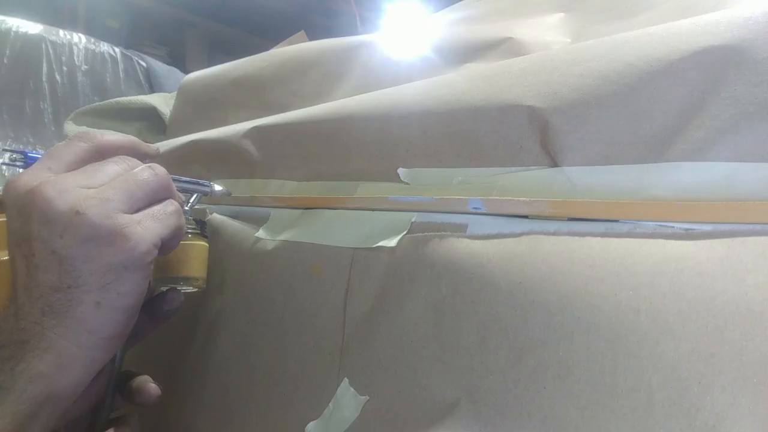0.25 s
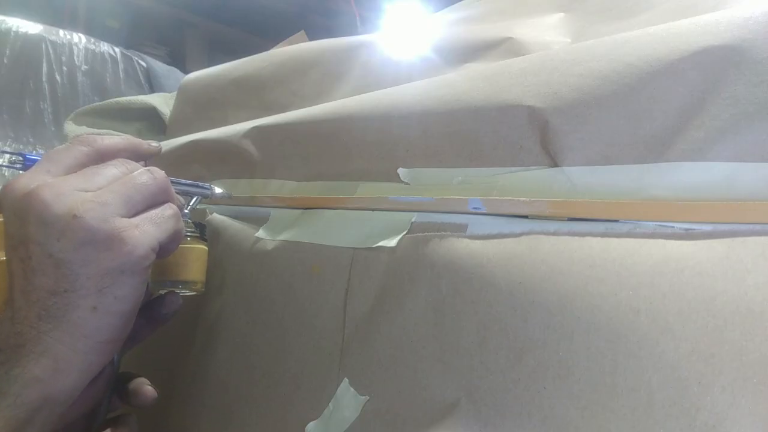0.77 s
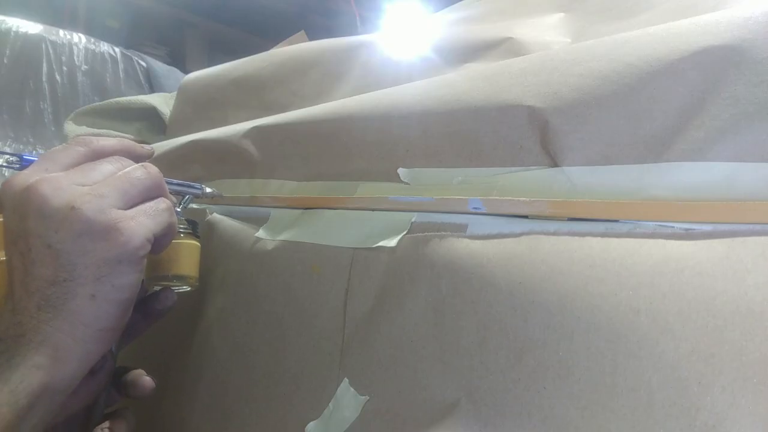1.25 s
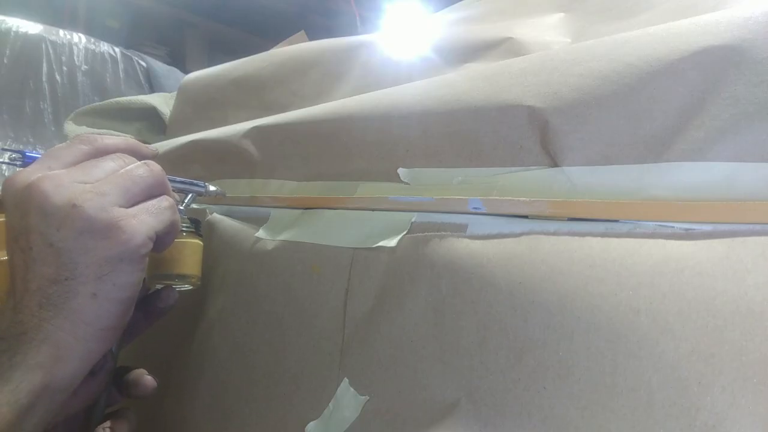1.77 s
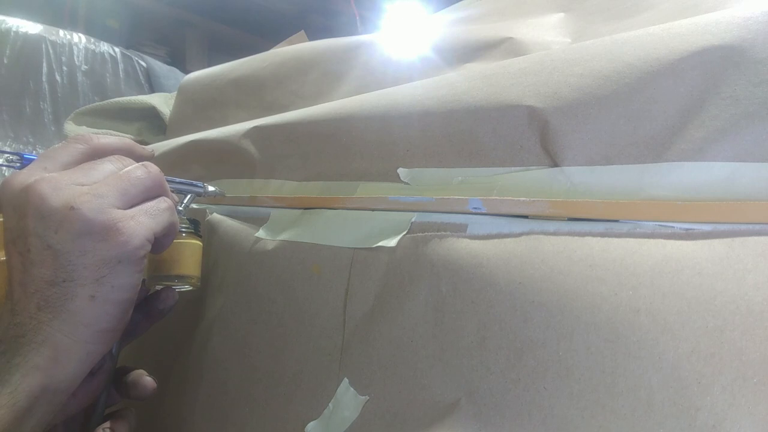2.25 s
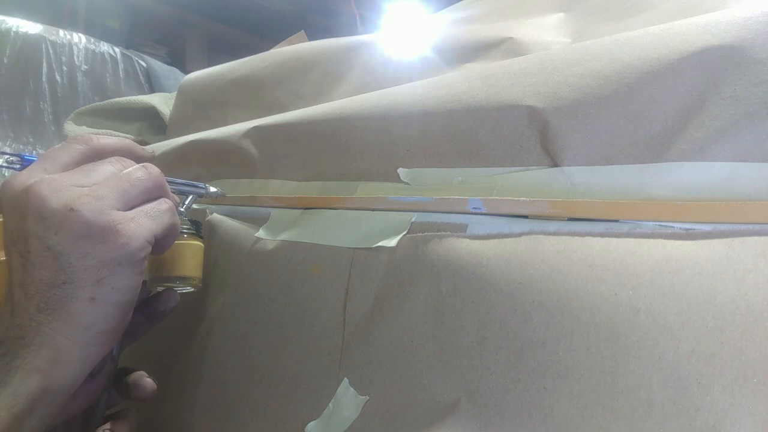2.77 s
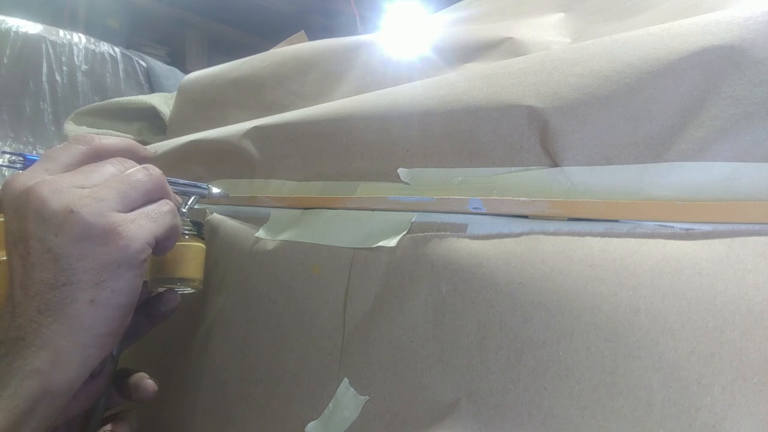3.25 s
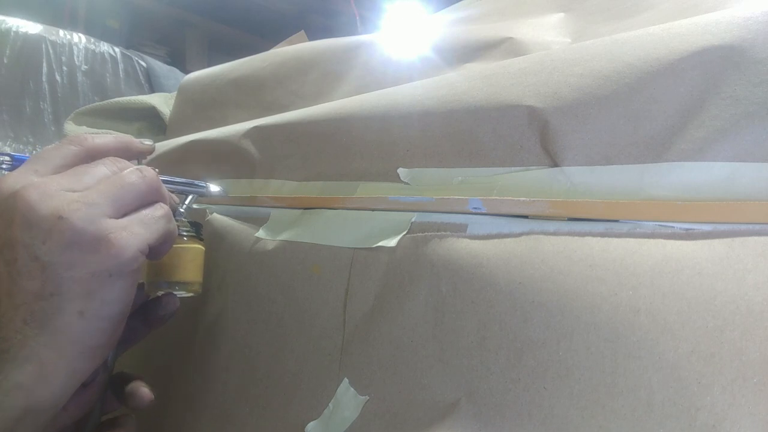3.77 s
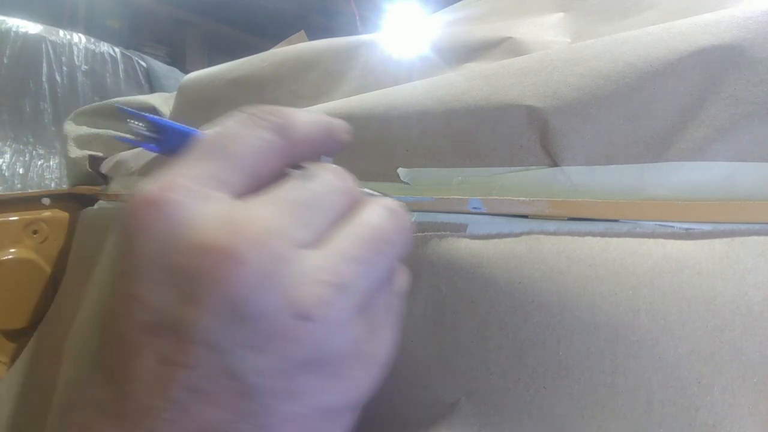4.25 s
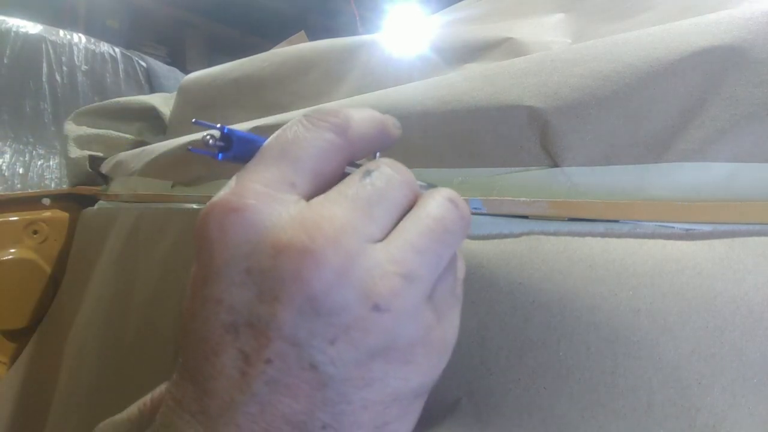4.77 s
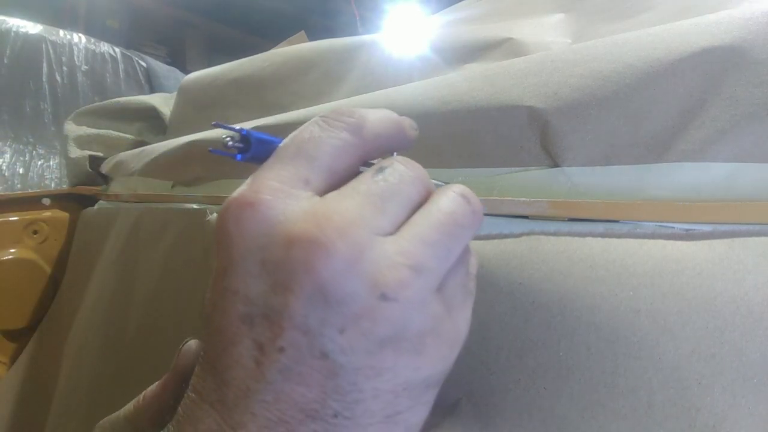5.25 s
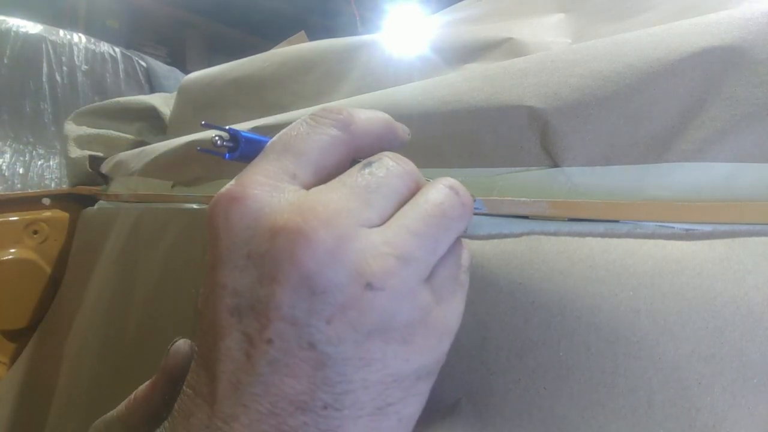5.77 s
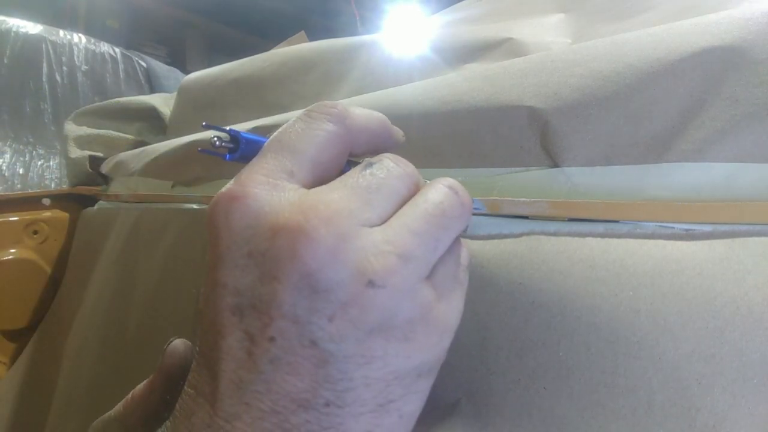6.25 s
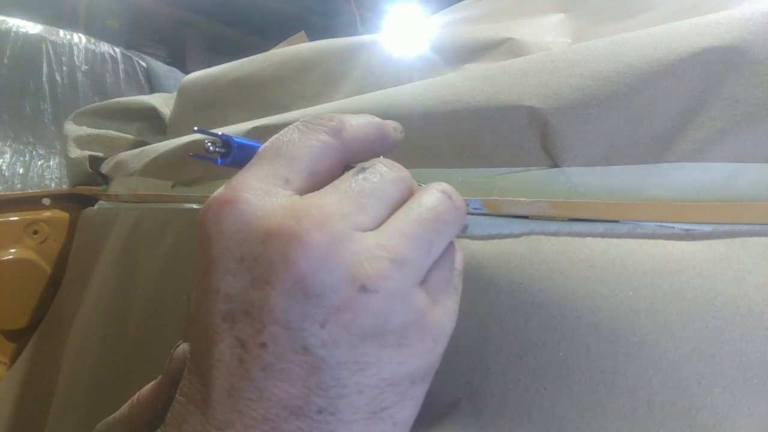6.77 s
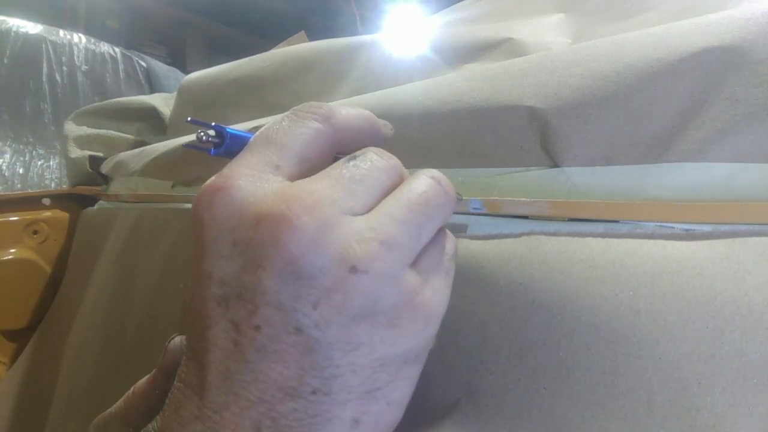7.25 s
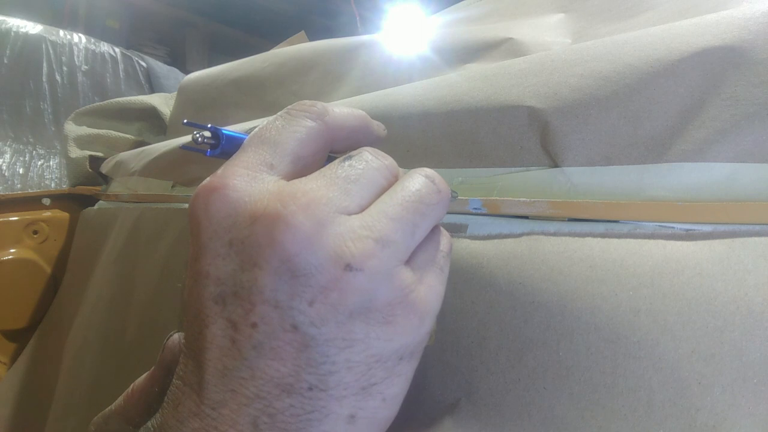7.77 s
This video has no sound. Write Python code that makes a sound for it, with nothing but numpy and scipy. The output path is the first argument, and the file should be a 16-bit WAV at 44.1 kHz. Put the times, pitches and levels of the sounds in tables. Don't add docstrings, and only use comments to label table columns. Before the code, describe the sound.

Sharp, fizzy airbrush spray starts and stops four times; between the middle bursts a hand shifts with soft clicks, a clink and a hollow thump.

```python
import sys
import numpy as np
from scipy import signal
from scipy.fft import rfft, irfft
from scipy.io import wavfile
from scipy.ndimage import uniform_filter1d

SR = 44100
rng = np.random.default_rng(int(sys.argv[2]) if len(sys.argv) > 2 else 0)


def generate_wav(signal):
    frames = np.transpose(np.atleast_2d(signal))
    scaled = np.clip(frames, -1, 1) * 32767
    pcm = np.round(scaled).astype(np.int16)
    wavfile.write(sys.argv[1], SR, pcm)


def field_ratio(decibels):
    return 10 ** (np.asarray(decibels, dtype=float) / 20)


N = 352800
T = np.arange(N) / SR
HZ = np.fft.rfftfreq(N, 1 / SR)
# [f/Hz], [width/Hz], [level/dB], [t60/s]
BARREL = [(750, 350, -9, .022), (990, 300, -8, .022), (1340, 450, -5, .02), (1800, 710, -5, .02)]
CUP = [(580, 300, -7, .1), (680, 650, -5.5, .25), (1380, 500, -4, .07), (2100, 900, 0, .045),
       (2800, 3000, -3, .05), (3400, 600, -5, .05), (3750, 500, 0, .06), (4500, 500, -2, .06),
       (5220, 500, -3, .06), (6900, 800, -6, .05)]
BENCH = [(560, 360, -2, 0.1), (1600, 400, -11, .036)]


def evened(x):
    return x / np.sqrt(np.mean(x ** 2) + 1e-20)


def read(points, hz):
    f, value = np.transpose(points)
    return np.interp(np.log(hz + 1), np.log(f + 1), value)


def add(mix, s, sound):
    part = mix[round(s * SR):][:len(sound)]
    part += sound[:len(part)]


def coloured(gain):
    size = 2 * len(gain) - 2
    return evened(irfft(rfft(rng.standard_normal(size)) * gain, size))


def wander(hz):
    slow = coloured(1 / (1 + (HZ[:N // 32 + 1] / hz) ** 2))
    return np.interp(T, T[::16], slow)


def band(hz, width, at=HZ):
    return 1 / (1 + (2 * (at - hz) / width) ** 2)


def step_up(hz, sharp, at):
    return 1 / (1 + (hz / (at + 1)) ** sharp)


def airbrush():
    # fully open [t/s], let go [t/s], last part of press [dB/s], creep of first leak [dB/s]
    bursts = [
        (0.0, 0.716, 1900, 450),
        (1.381, 3.535, 1900, 430),
        (5.644, 6.592, 762, 320),
        (7.085, 8.002, 1500, 800),
    ]
    # fizz on the work [level/dB], its drift [dB/s], nozzle rush [rel dB], top edge [rel dB]
    flows = [
        (-35.5, -4.5, -13, -11),
        (-39.5, 0.4, -12.5, -5),
        (-38, 0.5, -10, -2),
        (-38, 1, -9.5, -8),
    ]
    # [f/Hz], [level/dB per Hz]
    colours = [
        [(88, -56), (150, -27), (501, -25), (934, -14.5), (1070, -18), (1350, -10), (2120, -12.5), (3510, -8),
         (4880, -5), (8420, -10), (15700, -8)],
        [(88, -58), (150, -27), (1070, -16.5), (1330, -9), (2160, -13.5), (3510, -6), (4880, -5.5), (5280, -3),
         (8260, -6.5), (10800, -8.5), (15700, -22)],
        [(88, -54), (150, -33), (531, -8), (769, -9.5), (1050, -12.5), (1640, 0), (1960, -6.5), (3650, -6),
         (3940, -3), (6670, -7.5), (15700, -6)],
        [(88, -56), (150, -31), (621, -12), (1050, -16.5), (1550, -7), (2950, -6.5), (3650, 1), (5380, -4.5),
         (6800, -2.5), (7350, -5), (12000, -10), (15700, -12)],
    ]
    # [f/Hz], [width/Hz], [depth 0-1]
    gaps = [
        [(1040, 110, 0.43), (4820, 250, 0.8), (9050, 270, 0.4), (13600, 500, .5), (14880, 150, .3)],
        [(1090, 74, 0.54), (4860, 190, 0.7), (8880, 330, 0.5), (11110, 290, 0.8), (13100, 400, .3),
         (14880, 150, .4), (11900, 150, .2), (6220, 100, .55), (3680, 65, 0.2), (5780, 120, .4), (9080, 60, .5),
         (12700, 120, .4), (14350, 100, .3)],
        [(514, 65, 1), (5360, 250, 0.66), (7460, 300, 0.4), (9100, 330, 0.5), (3890, 90, .6), (4840, 70, 0.6),
         (4200, 50, 0.3), (5950, 60, .5), (7330, 200, .5), (12650, 150, .4), (14680, 200, .45), (8820, 80, .5)],
        [(470, 90, 0.7), (1020, 94, 0.54), (5380, 250, 0.7), (7340, 350, 0.8), (6150, 220, 0.6),
         (15420, 300, 0.4), (11900, 200, .4), (3890, 90, .6), (4780, 63, 0.6), (3430, 60, .5), (8600, 110, 0.5),
         (6050, 50, .5), (12650, 150, .4), (12950, 150, .3), (14680, 200, .45)],
    ]
    # [f/Hz],
    # [width/Hz], [level/dB]
    open_echoes = [(383, 37, -19), (970, 58, -19.5), (1830, 220, -13), (3530, 150, -4), (5375, 140, -3.5),
                   (7150, 230, -1.5), (8410, 440, -1), (9600, 180, -4), (11270, 100, -6), (12620, 190, -4.5),
                   (13100, 90, -19), (14220, 260, -7.5), (15250, 160, -8),
                   (2304, 33, -9.5), (2733, 44, -8), (2970, 57, -10), (3285, 19, 0), (4010, 19, -2.5),
                 (4420, 74, -1.5), (5500, 26, -7), (5980, 49, -3), (6670, 25, -3), (6770, 15, 0.5),
                 (10230, 40, -3.5), (13720, 90, -12), (14550, 120, -11)]
    # [f/Hz], [width/Hz], [level/dB]
    screened_echoes = [(340, 55, -14), (660, 130, -17.5), (1650, 130, -7.5), (3657, 140, 2), (4520, 150, -1),
                       (5010, 200, -2), (5800, 145, 0), (6720, 290, -0.5), (8060, 330, -4),
                       (10000, 170, -13.5), (11100, 270, -9.5), (12300, 240, -9), (14250, 240, -15),
                       (15300, 450, -14),
                       (2415, 37, -7), (2780, 41, -3), (2990, 50, -7.5), (3235, 72, -4), (4220, 75, -0.5),
                     (4180, 80, -5.5), (7200, 30, -9), (7660, 26, -9), (8100, 29, -12), (8550, 26, 0),
                     (8800, 50, -11), (10450, 35, -15), (13150, 90, -8)]
    # [f/Hz], [width/Hz], [level/dB]
    own_bands = [
        [(1350, 62, -16), (3900, 26, -1.5), (5070, 55, -5), (5800, 130, -14), (10040, 81, -11),
         (11800, 49, -13)],
        [(5190, 27, 0.5), (8250, 53, -10), (8800, 70, -3), (11300, 46, -6), (13300, 25, -15), (6760, 40, -9),
         (15500, 300, -11), (13130, 100, -14), (6480, 50, -10)],
        [(1730, 80, -3.5), (730, 130, -11), (5060, 290, -7), (11300, 300, -15), (370, 62, -19), (2260, 40, -13)],
        [(4030, 50, -3), (4740, 60, -8), (5630, 55, 1), (8200, 80, -13), (9920, 130, -7.5), (2800, 54, -16)],
    ]
    shared = 2 * [open_echoes] + 2 * [screened_echoes]
    echoes = [common + own for common, own in zip(shared, own_bands)]
    return sum(jet(*burst) for burst in zip(bursts, flows, colours, echoes, gaps))


def jet(press, flow, colour, lifts, gaps):
    breathe_db, shift = 1.0, .002
    start = max(round((press[0] - .13) * SR), 0)
    stop = min(round((press[1] + .06) * SR), N)
    t = T[start:stop]
    frames = (stop - start) // 512 + 5
    hz = np.fft.rfftfreq(2048, 1 / SR)[:, None]
    a, b, patches = rng.standard_normal((frames, len(hz), 3)).T
    patches = evened(uniform_filter1d(uniform_filter1d(patches, 14, 0), 12, 1))
    swayed_hz = hz * (1 + .0015 * wander(1.5)[::512][:frames])
    own = rng.standard_normal((frames, len(lifts), 2)).T
    own = evened(uniform_filter1d(uniform_filter1d(own, size=10), size=10))

    smooth = field_ratio(read(colour, hz))
    power = (field_ratio(-5.5) * smooth) ** 2
    for (f, width, db), swell, slip in zip(lifts, *own):
        power = power + field_ratio(db + breathe_db * swell) ** 2 * band(f * (1 + shift * slip), width, swayed_hz)
    whistle_db = -3 - 28 * abs(t[0] + np.arange(frames) * 512 / SR - 7.17)
    near = np.hypot(np.sqrt(power), field_ratio(whistle_db) * np.sqrt(band(15640, 240, hz)))
    for f, width, depth in gaps:
        near = near * (1 - min(depth, .95) * band(f, width, swayed_hz))

    mid, top = step_up(2560, 11.2, hz), step_up(9060, 4.7, hz)
    shares = (1 - mid, mid * (1 - top), top)
    fizz_db, rush_db, edge_db = controls(t, press, flow)
    flutter = field_ratio(0.39 * wander(27.0) + 0.31 * wander(300.))[start:stop]
    out = np.zeros((2, N))
    for k, shape in enumerate((near * field_ratio(0.98 * patches), smooth)):
        parts = []
        for share in shares:
            noise = signal.istft((a + 1j * b) * shape * np.sqrt(share), nperseg=2048, noverlap=1536)[1]
            parts.append(evened(noise[:len(t)]))
        rush, fizz, edge = parts
        out[k, start:stop] = field_ratio(rush_db) * rush + flutter * (field_ratio(fizz_db) * fizz + field_ratio(edge_db) * edge)
    return out


def controls(t, press, flow):
    # centre [t/s], half length [s], nearer the work [dB], turned to the microphone [dB]
    moves = [(0.0, 0.14, 5.5, 5.5), (0.263, 0.08, 6.5, 5), (.52, 0.036, 1.5, 3), (.73, 0.069, -1, -5),
             (1.38, 0.054, -0.5, 1.5), (1.544, .11, 5.5, 2), (1.706, 0.14, -3, 4), (1.898, 0.22, 7.5, 1.5),
             (2.095, 0.043, -1.5, -1), (2.35, 0.057, 3, 3.5), (2.422, 0.37, 4, -1), (2.597, 0.052, 3, -0.5),
             (3.407, .035, 2, 0.5), (3.472, 0.11, 5.5, 3.5), (6, 0.25, 1, -9), (6.38, 0.079, -1.5, 3),
             (6.61, 0.1, -5, -4), (7.138, 0.089, 1, -3), (7.367, 0.06, 2, -2), (7.528, 0.092, 2.5, 0.5),
             (7.917, 0.22, 4.5, 2.5)]
    press_db, shut_db_per_s = 13, 1300
    rush_near, rush_turn, rush_lead = 0.46, 0.37, 0.38
    fizz_lag, edge_lag = 0.47, 0.99
    opened, shut, press_rate, creep_rate = press
    fizz_db, drift, rush_db, edge_db = flow
    near_db, turn_db = sum(np.outer((near, turn), np.exp(-abs((t - s) / half) ** 1.96))
                           for s, half, near, turn in moves)
    early_s = np.maximum(opened - t, 0)
    lack_db = np.minimum(early_s * press_rate, press_db)
    leak_db = creep_rate * np.maximum(early_s - press_db / press_rate, 0)
    closing_db = shut_db_per_s * np.maximum(t - shut, 0)
    valve_db = fizz_db + drift * (t - opened) - lack_db - leak_db - closing_db
    return (valve_db + near_db - fizz_lag * leak_db,
            valve_db + rush_db + rush_near * near_db - rush_turn * turn_db + rush_lead * lack_db,
            valve_db + edge_db + near_db + turn_db - edge_lag * lack_db)


def rubbing():
    # [t/s], [level/dB]
    drag = [
        (4, -87),
        (4.2, -75.5),
        (4.6, -69.5),
        (4.93, -75),
        (5.06, -65.5),
        (5.12, -69.5),
        (5.25, -70),
        (5.5, -83),
    ]
    # [f/Hz], [level/dB per Hz]
    paper = [(700, -6), (1100, -8), (1350, -4), (1800, -11), (2300, 1), (2680, -7), (3100, -2), (3600, -7),
             (4300, -15), (6000, -24), (12000, -60)]
    s, db = np.transpose(drag)
    effort = (T > s[0]) * (T < s[-1]) * field_ratio(np.interp(T, s, db))
    cloth = coloured(band(373, 150) + 0.55 * band(190, 80) + 0.11 * band(860, 700))
    out = effort * field_ratio(.6 * wander(30.)) * cloth
    outside = np.maximum((5.13 - T) / .07, 0) + np.maximum((T - 5.22) / 0.11, 0)
    slap_fall_db = np.maximum(60 * (T - 5.0) / 0.43, 20 * (5.0 - T) / 0.039)
    scrape = np.hypot(field_ratio(-68 - 20 * outside), field_ratio(-66 - slap_fall_db))
    rustle = np.hypot(scrape, effort / field_ratio(11))
    return out + rustle * field_ratio(1.0 * wander(90.)) * coloured(field_ratio(read(paper, HZ)))


def knocks():
    # [t/s], [peak level/dB], body
    hits = [(4.535, -62, BARREL), (4.581, -68, BARREL), (4.697, -62, BARREL), (4.744, -56, BARREL),
            (4.753, -62, BARREL), (4.983, -73, CUP), (5.007, -58, CUP), (5.012, -59, CUP),
            (5.023, -62, CUP), (5.034, -67, CUP), (5.05, -68, CUP), (5.069, -70, CUP), (5.192, -57, BENCH)]
    out, t = np.zeros(N), T[:8192]
    at_hz = np.fft.rfftfreq(len(t), 1 / SR)
    for s, hit_db, body in hits:
        for hz, width, db, t60 in body:
            decay = field_ratio(hit_db + db - 60 * t / t60) * np.minimum(t / 0.0024, 1)
            add(out, s, decay * coloured(band(hz, width, at_hz)))
    return out


def rings():
    # [t/s], [level/dB], [f/Hz], [t60/s]
    modes = [(4.401, -54, 105, 0.1), (4.533, -64, 1300, .035), (4.533, -68, 1650, .03),
             (4.533, -68, 780, .04), (4.745, -59, 1750, .022), (4.745, -67, 2050, .02),
             (4.746, -55, 1290, .03), (4.7465, -59, 1010, 0.029), (4.748, -62, 830, .03),
             (4.748, -60, 700, .025), (4.534, -60, 239, .05), (4.756, -60, 416, .04), (5.2, -63, 1400, .04),
             (4.984, -65, 3300, .06), (4.986, -65, 1140, .06), (5.0065, -60, 7800, 0.12),
             (5.0095, -62, 11940, .035), (5.008, -63, 6200, .04), (5.008, -62, 7150, .05),
             (5.0095, -55, 3750, .08), (5.0095, -56, 4860, .06), (5.012, -57, 4430, .09),
             (5.012, -58, 5200, .07), (5.012, -58, 2620, .045), (5.013, -54, 1410, .06),
             (5.021, -57, 3600, .06), (5.02, -55, 4400, .06), (5.03, -59, 3500, .05),
             (5.03, -57, 4500, .05), (5.045, -63, 5100, .07), (5.085, -60, 1300, .05),
             (5.013, -58, 2090, .05), (5.011, -54, 470, .07), (5.031, -61, 5100, .06),
             (5.069, -59, 1260, .07), (5.173, -66, 1350, .06), (5.1916, -44, 195, 0.068),
             (5.1903, -44.5, 377, 0.067), (5.192, -63, 1000, .05), (5.196, -59, 760, .08),
             (5.202, -59, 570, 0.07), (5.204, -61, 1420, .05), (5.2185, -52, 230, .03),
             (5.2255, -45.5, 375, 0.045), (5.227, -63, 800, .04), (5.238, -51, 370, .045),
             (7.1, -61, 327, 0.046)]
    out, t = np.zeros(N), T[:8192]
    for s, db, hz, t60 in modes:
        attack = np.minimum(t / np.clip(1.5 / hz, .0013, .0024), 1)
        add(out, s, -field_ratio(db - 60 * t / t60) * attack * np.sin(2 * np.pi * hz * t))
    return out


def crickets():
    # first [t/s], last [t/s], peak [level/dB]
    high_cricket = [(0.799, 1.308, -72), (3.661, 3.926, -73), (4.054, 4.054, -79), (4.16, 4.296, -71.5),
                    (4.42, 4.542, -73), (4.652, 4.898, -72.5), (5.133, 5.133, -71.5), (5.221, 5.221, -75),
                    (5.342, 5.474, -71.5), (6.698, 6.954, -72.5)]
    low_cricket = [(0.857, 1.258, -69), (3.659, 3.925, -68), (4.058, 4.058, -72), (4.188, 4.456, -68.5),
                   (4.585, 4.99, -68.5), (5.12, 5.518, -68.5), (6.77, 7.04, -69)]
    chirp_s, scatter_db, slide_scatter, third_db = .128, 1., .15, -13
    out, t = np.zeros(N), np.arange(round(.014 * SR)) / SR
    stroke = np.sin(np.pi * t / t[-1])
    # runs, start f/Hz, slide Hz/s, second stroke dB, stroke gap s, lead s
    songs = ((high_cricket, 7600, -58000, 4.5, .0235, .006), (low_cricket, 6860, -20000, -2., .0245, .004))
    for runs, hz, slide, second_db, gap, lead in songs:
        for first, last, db in runs:
            for s in np.linspace(first, last, round((last - first) / chirp_s) + 1):
                a, b = rng.standard_normal(2)
                cycles = hz * t + slide * (1 + slide_scatter * b) * t ** 2 / 2
                tone = field_ratio(db + scatter_db * a) * stroke * np.sin(2 * np.pi * cycles)
                add(out, s - lead, tone)
                add(out, s - lead + gap, field_ratio(second_db) * tone)
                add(out, s - lead + 2 * gap, field_ratio(third_db) * tone)
    return out


def garage(x):
    # [f/Hz], [t60/s]
    decay = [(200, 0.24), (1000, 0.18), (4000, 0.27), (6000, 0.24), (9000, 0.2), (15000, 0.21)]
    taps = np.zeros(SR // 2)
    at = np.arange(150, len(taps) - 20, 20)
    taps[at + rng.integers(0, 20, len(at))] = rng.choice([-1., 1.], len(at))
    hz, t, z = signal.stft(taps, SR, nperseg=256)
    tail = signal.istft(z * field_ratio(-60 * t / read(decay, hz)[:, None]), SR, nperseg=256)[1]
    echo, tail_hz = rfft(tail), np.fft.rfftfreq(len(tail), 1 / SR)
    level = np.sqrt(uniform_filter1d(abs(echo) ** 2, size=30) / read(decay, tail_hz))
    tail = irfft(echo / level, len(tail)) * (np.arange(len(tail)) < .45 * SR)
    return signal.fftconvolve(x, tail / np.linalg.norm(tail))[:N]


def quiet():
    # [f/Hz], [level/dB per Hz]
    hum_colour = [(15, -52), (25, -29), (45, -6.5), (75, -3), (105, -3.5), (160, -9.5), (210, -13.5),
                  (320, -16.5), (450, -24.5), (600, -26), (800, -34), (1500, -60)]
    hiss_colour = [(410, -27), (700, -5), (1930, -10), (3000, -8), (4010, -7), (5630, -8), (6250, -4.5),
                   (6930, -4.5), (8000, -7), (9110, -5.5), (10200, -9), (15800, -8.5)]
    # [f/Hz], [width/Hz], [level over the hiss/dB]
    chorus_bands = [(4080, 220, -1), (8500, 130, -4), (9500, 400, -2), (10650, 200, 2), (8950, 250, -3),
                    (11100, 100, -6), (13750, 700, -6), (15400, 300, -2), (4970, 720, -4.5)]
    hum_db, hiss_db = -67, -70.5
    hum = field_ratio(hum_db + .9 * wander(3.)) * coloured(field_ratio(read(hum_colour, HZ)))
    hiss = field_ratio(read(hiss_colour, HZ))
    chorus = hiss * np.sqrt(sum(field_ratio(db) ** 2 * band(hz, width) ** 2 for hz, width, db in chorus_bands))
    far = field_ratio(-8.5 + 1.2 * wander(6.)) * coloured(chorus)
    return hum + field_ratio(hiss_db) * (coloured(hiss) + far)


def scene():
    brush, spread = airbrush()
    hand = rubbing() + knocks() + rings()
    insects = crickets()
    echoes = garage(field_ratio(-11.0) * spread + field_ratio(-8.0) * hand + field_ratio(-4) * insects)
    return np.tile(field_ratio(-2.08) * brush + hand + insects + echoes + quiet(), (2, 1))


def band_limit(x):
    return signal.sosfilt(signal.butter(12, 16780, fs=SR, output="sos"), x)


def record(dry):
    # [t/s], low edge [f/kHz], high edge [f/kHz]
    splits = [(1.45, 11, 12.4), (1.45, 13.8, 15.2), (1.82, 6.9, 8.3), (1.82, 11, 12.4), (2.1, 4.7, 6.3),
              (2.1, 12.4, 14.5), (2.12, 6.3, 7.6), (2.75, 4.7, 5.7), (2.75, 9.6, 12.4), (3.07, 4.1, 5.7),
              (3.07, 14.5, 15.8), (3.26, 5.7, 6.9), (3.45, 10.3, 11.7), (4.05, 6.3, 7.6), (4.05, 11, 12.4),
              (4.45, 4.7, 6.3), (5.44, 14.5, 15.8), (5.89, 5.2, 6.3), (5.91, 4.1, 5.2), (6, 5.7, 6.9),
              (6.1, 10.3, 12.4), (6.1, 13.1, 15.2), (6.16, 11.7, 13.1), (6.31, 13.8, 15.8),
              (6.81, 5.7, 7.6), (7.24, 5.2, 6.3), (7.24, 9, 11), (7.67, 4.7, 5.7), (7.67, 6.9, 8.3),
              (7.67, 10.3, 11.7), (7.77, 4.1, 5.2)]
    edge_hz = 15760
    window, hz = signal.windows.kaiser_bessel_derived(2048, 4 * np.pi), np.fft.rfftfreq(2048, 1 / SR)
    out = dry.copy()
    for s, low, high in splits:
        block = round((s * SR - 350) / 1024) - 1
        at = slice(350 + 1024 * block, 350 + 1024 * (block + 2))
        patch = rfft(window * dry[0, at]) * (hz > 1000 * low) * (hz < 1000 * high)
        other = patch * np.exp(2j * np.pi * rng.random(len(hz)))
        out[:, at] += window * irfft([.9 * other - .3 * patch, -.9 * other - .3 * patch])
    limited = irfft(rfft(out) * np.clip((edge_hz - HZ) / 60 + .5, 0, 1), N)
    return band_limit(limited)


dry = scene()
out = record(dry)
generate_wav(out)
```